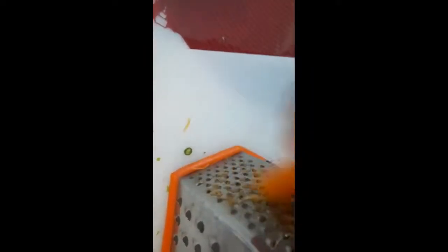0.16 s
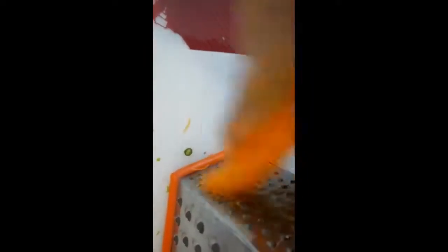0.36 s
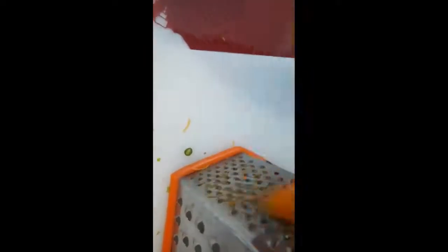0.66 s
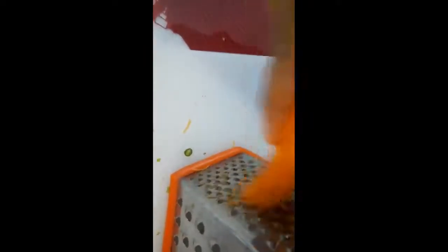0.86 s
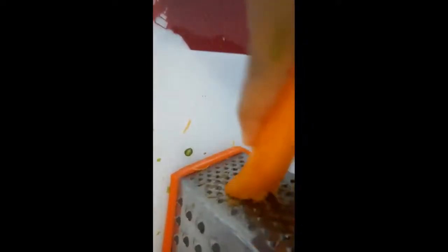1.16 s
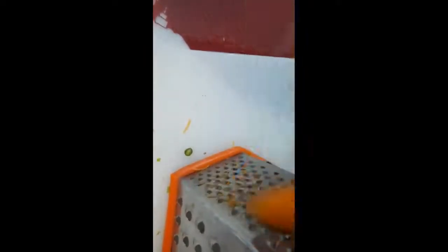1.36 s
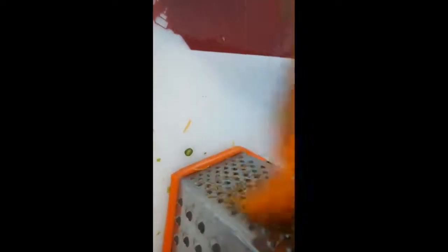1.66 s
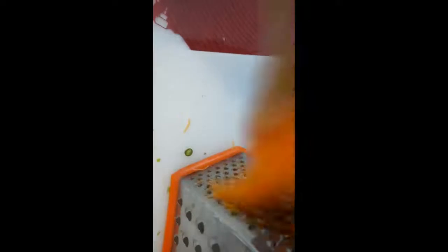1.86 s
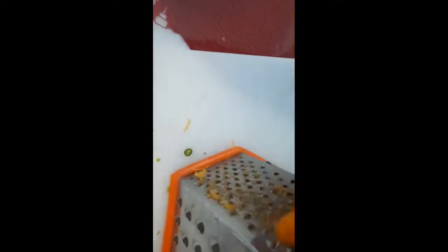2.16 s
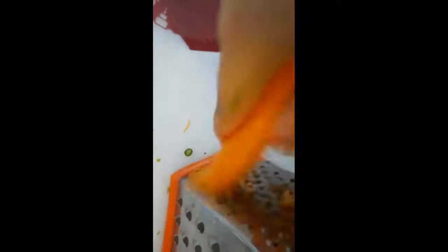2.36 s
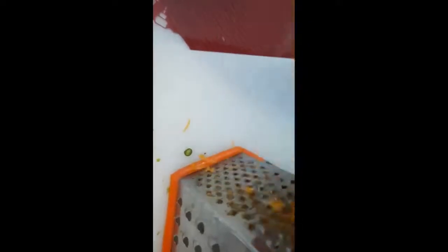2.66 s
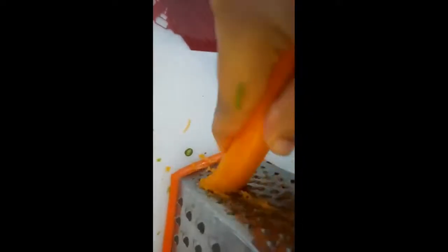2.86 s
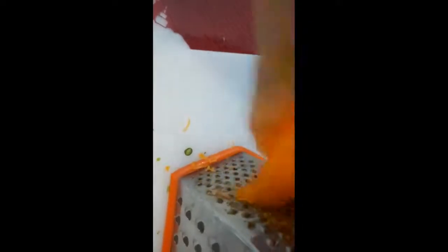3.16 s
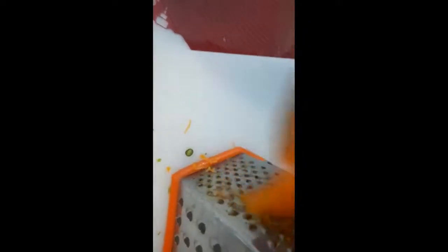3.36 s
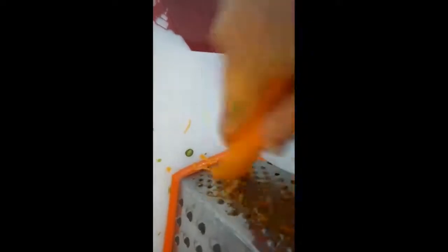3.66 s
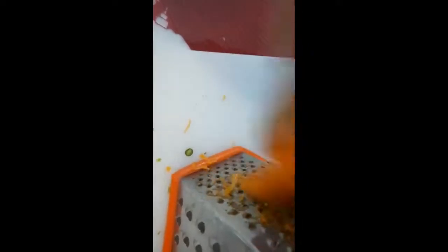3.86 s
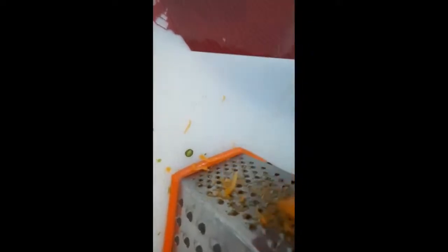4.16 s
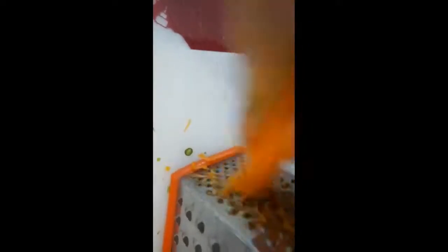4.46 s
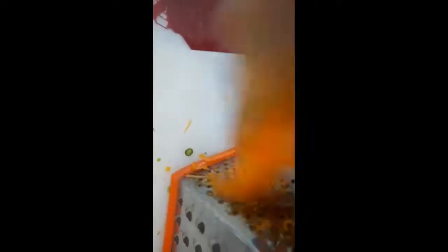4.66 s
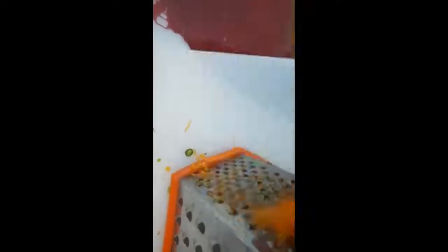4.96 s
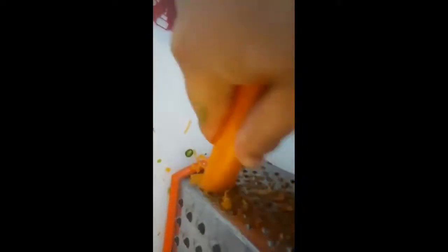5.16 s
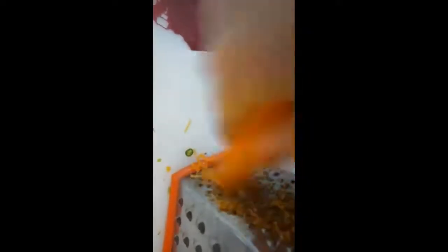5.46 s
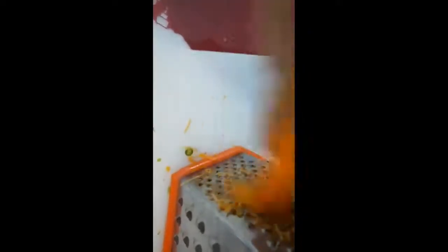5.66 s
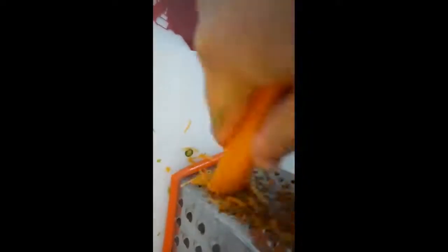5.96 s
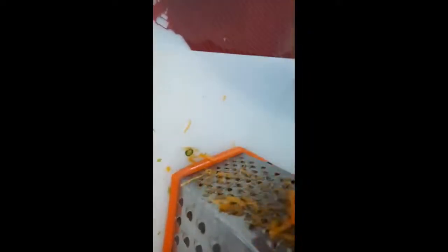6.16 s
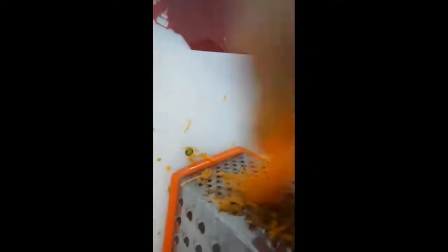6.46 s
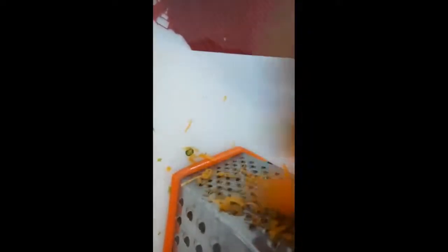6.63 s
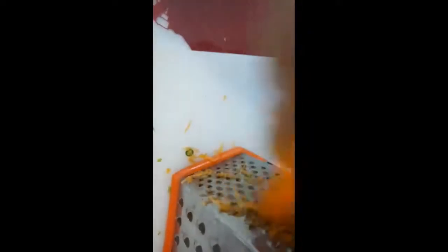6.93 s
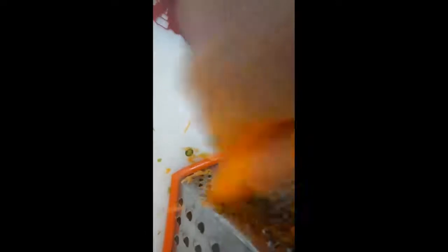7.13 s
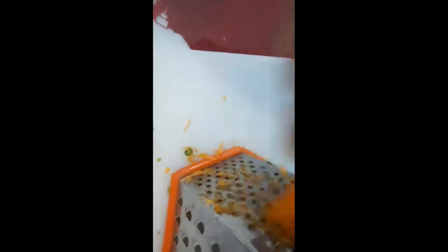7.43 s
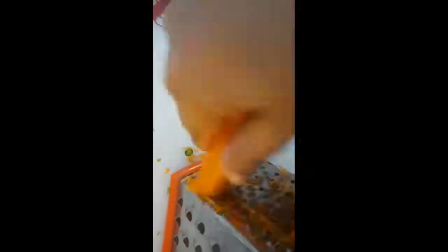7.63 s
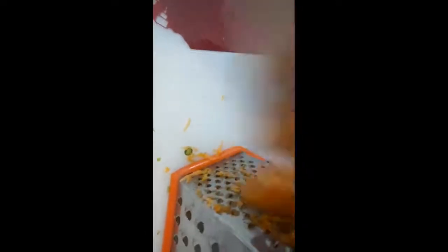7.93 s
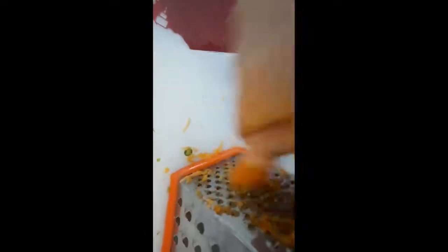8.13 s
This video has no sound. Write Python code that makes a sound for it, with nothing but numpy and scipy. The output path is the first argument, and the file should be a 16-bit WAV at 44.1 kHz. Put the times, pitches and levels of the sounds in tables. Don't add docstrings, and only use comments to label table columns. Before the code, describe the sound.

A carrot is rasped down and up a thin steel box grater in quick even strokes, with wet fizz, metallic ringing and soft board thumps.

```python
import sys
import numpy as np
from scipy import signal
from scipy.fft import rfft, irfft
from scipy.io import wavfile
from scipy.ndimage import uniform_filter1d

SR = 44100
rng = np.random.default_rng(int(sys.argv[2]) if len(sys.argv) > 2 else 0)


def dump(signal):
    limited = np.clip(np.atleast_2d(signal).T, -1, 1)
    pcm = np.round(limited * 32767).astype(np.int16)
    wavfile.write(sys.argv[1], SR, pcm)


def nominal_scale(level):
    x = np.asarray(level, float) / 20
    return 10 ** x


N = 365588

# [f/Hz, level/dB per Hz]
AIR = [(40, -2.5), (400, 2), (1500, -7), (3500, -38), (5000, -27), (7800, -16.5), (8300, -18), (11300, -20),
       (11900, -20.5)]
AIR_DB = -75
ECHO_DB, ECHO_T60_S = -18, 0.31
# [f/Hz, width/Hz, depth 0-1]
NOTCHES = [(1120, 43, 0.33), (2310, 73, 0.74)]

# [f/Hz, width/Hz, level/dB]
BOARD = [(57.1, 42, 3), (72.6, 37, 2.5), (112.8, 43, -1.5), (150.6, 16, -12)]
# [start t/s, build-up/s, hold/s, shake level/dB]
BUMPS = [
    (2.36, .015, .03, -61),
    (5.93, .015, .03, -61),
    (6.81, 0.016, 0.027, -58.5),
    (7.8, 0.014, 0.022, -64),
]
REBOUND_DB, REBOUND_HZ, REBOUND_T60_S = 2, 59.6, 0.1
SHOVE_LAG_S, UP_SHOVE_DB, REST_SHAKE_DB = 0.007, -20.5, -87.5

# [t/s, peak level/dB]
PINGS = [
    (1.063, -54),
    (2.376, -50),
    (3.104, -45),
    (6.846, -37.5),
]
# [f/Hz, level/dB, time to fall 60 dB/s]
PING_TONES = [(1340, -10.5, 0.056), (1970, -5.5, 0.036), (3250, -6, 0.031), (3450, 1, 0.035),
              (5400, -17, 0.037)]

# [f/Hz, width/Hz, level/dB]
WALLS = [(272.2, 42.6, -4.5), (340, 51, -2), (393.6, 35, -4), (579.7, 94, -4.5), (645.5, 112, -4.5),
         (742, 159, 0), (852, 110, -6.5), (943, 38, -3.5), (1210, 19, -8), (1325, 27, 0), (1427, 117, -4),
         (1524, 167, -3), (1774, 163, -5.5), (1933, 218, -3), (2172, 76, -7.5)]
# [f/Hz, width/Hz, level/dB]
FACE = [(2747, 150, -3.5), (2942, 240, -5), (3123, 290, -2), (3246, 73, -9), (3462, 82, 0.5),
        (3518, 84, -1.5), (3724, 91, -10.5), (4110, 190, -17.5)]
# [f/Hz, level/dB per Hz]
FIZZ = [(3000, -7), (4200, 0), (4900, -6), (5450, -2.5), (6000, -4.5), (7500, -10), (8100, -9.5),
        (8500, -5.5), (9900, -4.5), (11300, -3.5), (11800, -17.5), (12600, -37)]
# [f/Hz, level/dB per Hz]
RUB = [(3000, -11.5), (4300, -2), (4900, -8), (5350, -3.5), (6200, -10), (6800, -10.5), (7300, -19.5),
       (8000, -9.5), (8550, -7), (11200, -7.5), (11800, -17), (12600, -36)]
# [f/Hz, level/dB per Hz]
SPRAY = [(10800, -17), (11800, -8), (12400, -3), (15600, 0), (15900, -34)]

# [t/s, tick level/dB, face ring relative to tick/dB]
CATCHES = [(0.099, -42, -8), (0.624, -56, -20), (0.862, -50, 6), (0.907, -41, -14), (1.064, -46, -3),
           (1.284, -44, 3), (1.538, -41, -8), (2.169, -32, -17), (2.375, -44, -8), (2.602, -41, -18),
           (3.003, -46, -12), (3.104, -38, -12), (3.232, -47, -14), (3.263, -39, -33), (3.37, -44, -15),
           (3.404, -34, -9), (3.746, -49, -19), (4.289, -49, -18), (4.392, -54, -19), (4.521, -43, -25),
           (5.334, -41, -2), (5.448, -23, -19), (5.844, -38, -19), (5.952, -43, -7), (6.846, -40, -10),
           (6.969, -43, -26), (7.35, -46.5, -14), (7.794, -33.5, -33), (7.843, -35, -28), (8.189, -45, -4)]
# [t/s, snap level/dB]
SNAPS = [(0.49, -27), (0.52, -37), (0.54, -46), (0.86, -45), (1.062, -30), (2.375, -32), (2.84, -41),
         (3.104, -29), (3.233, -32), (5.449, -28), (5.952, -37), (6.345, -38), (6.437, -39), (6.846, -38)]

# [touch t/s, build-up/s, hold/s, bite level/dB, shove on board relative to bite/dB]
DOWN = [(0.183, 0.091, 0.075, -51.5, -6.0), (0.588, 0.064, 0.0068, -47, -7),
        (0.928, 0.054, 0.012, -42.5, -4), (1.281, 0.096, 0.031, -40.5, -6.5),
        (1.708, 0.1, 0.046, -42.5, -4.5), (2.15, 0.049, 0.047, -43.0, -5), (2.623, 0.066, 0.074, -46, -4.5),
        (2.997, 0.042, 0.012, -45.5, -6), (3.387, 0.083, 0.034, -39.5, -5.5),
        (3.76, 0.072, 0.051, -42.5, -9), (4.142, 0.07, 0.027, -43.5, -8.5), (4.532, 0.08, 0.045, -40.5, -6),
        (4.912, 0.078, 0.098, -43.5, -7.5), (5.321, 0.082, 0.038, -40.5, -6.5),
        (5.716, 0.067, 0.028, -42, -5), (6.121, 0.058, 0.092, -43.5, -4), (6.517, 0.077, 0.057, -44, -1.5),
        (6.968, 0.06, 0.063, -43.5, -4.5), (7.368, 0.055, 0.099, -43, -4.0),
        (7.846, 0.032, 0.064, -42, -8.5), (8.177, 0.052, 0.27, -48, -9)]
PUSHED_ON = [
    (2.253, 0.04, 0.033, -42, -2.5),
    (3.103, 0.046, 0.0025, -39.5, -2.5),
    (4.275, 0.025, 0.026, -47, 0),
    (5.835, 0.029, 0.017, -43, -2),
    (6.654, 0.02, 0.022, -44.5, -7),
]
# [touch t/s, build-up/s, hold/s, bite level/dB, fizz relative to bite/dB]
UP = [(-0.002, 0.16, 0.017, -61, -13), (0.419, 0.007, 0.103, -54.0, -12.5),
      (0.806, 0.034, 0.027, -62.5, -9), (1.06, 0.018, 0.003, -65.5, -4), (1.164, 0.074, 0.0032, -62.0, -15),
      (1.533, 0.021, 0.063, -54, -11.5), (1.975, 0.04, 0.064, -56, -10.5), (2.372, 0.003, 0.15, -54, -14),
      (2.856, 0.011, 0.077, -61.0, -11.5), (3.267, 0.0032, 0.044, -56, -12),
      (3.621, 0.024, 0.044, -53, -16.5), (3.981, 0.024, 0.063, -52.5, -11.5),
      (4.379, 0.025, 0.066, -55.0, -13), (4.761, 0.048, 0.055, -56.5, -11.5),
      (5.169, 0.042, 0.038, -52.5, -14), (5.557, 0.031, 0.06, -51.5, -12), (5.956, 0.05, 0.05, -52, -11),
      (6.366, 0.075, 0.014, -56, -16), (6.776, 0.09, 0.024, -55, -17), (7.212, 0.011, 0.061, -56.5, -12.5),
      (7.595, 0.012, 0.117, -57.5, -17.5), (7.795, 0.003, 0.0074, -62.5, -21),
      (8.043, 0.057, 0.029, -50.5, -20.0)]
# [t/s, bite level/dB]
WOBBLES = [(0.101, -56), (0.488, -62), (1.645, -60), (2.112, -59.5), (2.745, -47.5), (4.47, -71),
           (5.44, -58), (6.052, -54), (6.43, -52), (7.079, -45), (7.515, -51)]
WOBBLE_BUILD_S, WOBBLE_HOLD_S = 0.0062, 0.0052
# [t/s, juice level/dB, free ring of the face/dB]
WEAR = [(0, 1.5, -2.5), (1, -3.5, -2), (2, 0, -1.5), (2.8, 3, -1), (3.6, -2.5, -2), (4.4, -1, 0),
        (5.3, -5.5, -3), (6, -2, -0.5), (6.6, -6.5, -3), (7.1, -4, -1.5), (7.7, -5.5, -4.5),
        (8.3, -9.5, -3.5)]

# (landing dB/s, build-up dB, sag while held dB, lift dB/s, break-off dB)
DOWN_SHAPE = (1140, 17.2, 3.68, 590, 4.6)
UP_SHAPE = (490, 4.9, 4.1, 400, 3)
SHOVE_SHAPE = (770, 16.4, 2.5, 470, 0.51)
WOBBLE_SHAPE = (1500, 9.6, 6.7, 920, 0.6)
BREAK_S = 0.0083

DOWN_FACE_DB, DOWN_FIZZ_DB, DOWN_SPRAY_DB = -4.5, -10.5, -16
UP_FACE_DB, UP_SPRAY_DB = -2, -13
DOWN_UPPER_DB, UP_UPPER_DB = -1.5, 0.27
FACE_PER_BITE = -0.17


def evened(x, size=N):
    power = uniform_filter1d(uniform_filter1d(x ** 2, size), size)
    return x / np.sqrt(abs(power) + 1e-20)


def coloured(x, points):
    f, db = np.transpose(points)
    hz = np.fft.rfftfreq(2 ** 19, 1 / SR)
    gain = nominal_scale(np.interp(np.log(hz + 1), np.log(f + 1), db))
    return irfft(rfft(x, 2 ** 19) * gain)[:N]


def curves(rows):
    s, *columns = np.transpose(rows)
    return [np.interp(np.arange(N) / SR, s, c) for c in columns]


def wander(db, hz):
    knots = nominal_scale(db * rng.standard_normal(4000))
    return np.interp(np.arange(N) * min(hz, 450) / SR, np.arange(len(knots)), knots)


def rising_slope(level_db):
    slope = uniform_filter1d(np.gradient(level_db), size=1500) * SR
    return np.clip(slope / 400, -1, 1)


def bites(per_s, spread_db):
    size = nominal_scale(spread_db * np.minimum(rng.exponential(1, N), 4))
    sign = rng.choice([-1., 1.], N)
    return size * sign * (rng.random(N) < per_s / SR)


def ring(x, modes, drift_db, drift_hz):
    out = np.zeros(N)
    for hz, width, db in modes:
        b, a = signal.iirpeak(hz, hz / (1.307 * width), SR)
        once = signal.lfilter(b, a, x * wander(drift_db, drift_hz))
        out += nominal_scale(db) * signal.lfilter(b, a, once)
    return out


def patchy(x, db):
    _, _, z = signal.stft(x, SR, nperseg=512)
    patches = rng.standard_normal(z.shape)
    for axis in (0, 1):
        patches = uniform_filter1d(patches, size=9, axis=axis)
    return signal.istft(z * nominal_scale(db * patches / patches.std()), SR, nperseg=512)[1][:N]


def pressed(rows, shape):
    land, build_db, sag_db, lift, break_db = shape
    t, gone_db = np.arange(0, N + 32, 32) / SR, 60
    levels_db = np.cumsum([-gone_db - build_db, gone_db, build_db, -sag_db, -break_db, -gone_db])
    power = np.zeros(len(t))
    for s, build, hold, db, *_ in rows:
        times = np.cumsum([-gone_db / land, gone_db / land, build, hold, BREAK_S, gone_db / lift])
        power += nominal_scale(2 * (db + np.interp(t - s, times, levels_db)))
    return np.interp(np.arange(N) / SR, t, power)


def still_air():
    return nominal_scale(AIR_DB) * evened(coloured(rng.standard_normal(N), AIR))


def kitchen(x):
    t, out = np.arange(SR // 3) / SR, np.zeros(N)
    turn = np.arange(N) / SR * 2.7
    for k in range(3):
        tail = rng.standard_normal(len(t)) * nominal_scale(-60 * t / ECHO_T60_S) * (t > 0.004)
        tail = signal.lfilter(*signal.butter(1, 4000., fs=SR), tail)
        share = np.sqrt(2 / 3) * np.cos(np.pi * (turn + k / 3))
        out += signal.oaconvolve(x * share, tail / np.linalg.norm(tail))[:N]
    return out


def shake():
    shoves = [(s + SHOVE_LAG_S, build, hold, db + shove_db)
              for s, build, hold, db, shove_db in DOWN + PUSHED_ON]
    power = pressed(shoves + BUMPS, SHOVE_SHAPE)
    power = power + nominal_scale(2 * UP_SHOVE_DB) * pressed(UP, UP_SHAPE)
    return 10 * np.log10(power + nominal_scale(2 * REST_SHAKE_DB))


def rebound():
    t, lifts = np.arange(SR // 5) / SR, np.zeros(N + SR)
    for s, build, hold, db, shove_db in DOWN + PUSHED_ON:
        lifts[round((s + build + hold + 0.006) * SR)] = nominal_scale(db + shove_db + REBOUND_DB)
    swing = np.sin(2 * np.pi * REBOUND_HZ * t) * nominal_scale(-60 * t / REBOUND_T60_S)
    return signal.oaconvolve(lifts, swing)[:N]


def board():
    shake_db = uniform_filter1d(shake(), size=300)
    pushes = bites(600., 3.3)
    low = ring(pushes, BOARD[:2], drift_db=2.0, drift_hz=9.3)
    high = ring(pushes, BOARD[2:], drift_db=2.0, drift_hz=9.3)
    hum = evened(low + high * nominal_scale(2.1 * rising_slope(shake_db)), size=1200) * nominal_scale(shake_db)
    return signal.sosfilt(signal.butter(3, 38., "high", fs=SR, output="sos"), hum + rebound())


def pings():
    t, flicks = np.arange(3000) / SR, np.zeros(N)
    for s, db in PINGS:
        flicks[round(s * SR)] = nominal_scale(db)
    tone = sum(nominal_scale(db - 60 * t / t60) * np.sin(2 * np.pi * hz * t) for hz, db, t60 in PING_TONES)
    return signal.oaconvolve(flicks, tone * np.minimum(t / 0.0044, 1))[:N]


def catches():
    t = np.arange(3000) / SR
    tick, clink, snap = np.zeros((3, N + 3000))
    for s, tick_db, face_db in CATCHES:
        span = slice(round(s * SR), round(s * SR) + len(t))
        tick[span] += nominal_scale(tick_db - 60 * t / 0.08)
        clink[span] += nominal_scale(tick_db + face_db - 60 * t / 0.06)
    for s, snap_db in SNAPS:
        snap[round(s * SR):][:len(t)] += nominal_scale(snap_db - 60 * t / 0.033)
    return tick[:N], clink[:N], snap[:N]


def bite():
    extra = [(s, WOBBLE_BUILD_S, WOBBLE_HOLD_S, db) for s, db in WOBBLES]
    power = pressed(DOWN + PUSHED_ON, DOWN_SHAPE) + pressed(UP, UP_SHAPE)
    return 10 * np.log10(power + pressed(extra, WOBBLE_SHAPE))


def touch():
    juice_db, free_db = curves(WEAR)
    rows = []
    for s, build, hold, db, _ in DOWN + PUSHED_ON:
        face_db = DOWN_FACE_DB + FACE_PER_BITE * (db + 42.5)
        rows.append((s + build, face_db, DOWN_FIZZ_DB, DOWN_SPRAY_DB, DOWN_UPPER_DB, 1))
    for s, build, hold, db, fizz_db in UP:
        face_db = UP_FACE_DB + FACE_PER_BITE * (db + 54.5)
        rows.append((s + build + hold / 2, face_db, fizz_db, fizz_db + UP_SPRAY_DB, UP_UPPER_DB, 0))
    face_db, fizz_db, spray_db, upper_db, down = curves(sorted(rows))
    wet_db = down * juice_db
    return face_db + free_db, fizz_db + 0.21 * wet_db, spray_db + wet_db, upper_db


def walls(teeth, force, tick, upper_db):
    lower = evened(ring(teeth, WALLS[:8], drift_db=3.0, drift_hz=20.), size=1500)
    upper = evened(ring(teeth, WALLS[8:], drift_db=3.0, drift_hz=20.), size=1500)
    both = (lower + nominal_scale(upper_db) * upper) / np.sqrt(1 + nominal_scale(2 * upper_db))
    return both * (force + nominal_scale(-20.0) * tick)


def punched_face(teeth, force, clink, face_db, cutting, rising):
    flex = ring(teeth, FACE[:2], drift_db=4.5, drift_hz=16.)
    chime = ring(teeth, FACE[2:], drift_db=4.5, drift_hz=16.)
    face = evened(chime + flex * nominal_scale(4.6 * (cutting - 2)), size=1200)
    drive = force * nominal_scale(face_db + 0.37 * rising) * wander(1.85, 40.)
    return face * (drive + nominal_scale(-12) * clink)


def fibres_and_spray(tearing, snap, fizz_db, spray_db, cutting):
    shreds = bites(10000., 1.8)
    wet = np.sqrt(cutting) * evened(coloured(shreds, FIZZ))
    dry_rub = np.sqrt(1 - cutting) * evened(coloured(shreds[::-1], RUB))
    fibres = evened(patchy(wet + dry_rub, db=2.0), size=2000)
    fibres *= tearing * nominal_scale(fizz_db) * wander(1.37, 30.) + nominal_scale(-27.5) * snap
    spray = evened(coloured(shreds, SPRAY))
    spray *= tearing * nominal_scale(spray_db) * wander(2.6, 30.) + nominal_scale(-41) * snap
    return fibres + spray


def grater():
    bite_db = uniform_filter1d(bite(), size=200)
    face_db, fizz_db, spray_db, upper_db = touch()
    force = evened(wander(1.44, 190.) * wander(0.67, 50.), size=1500) * nominal_scale(bite_db)
    rising = rising_slope(bite_db)
    pressure_db = uniform_filter1d(bite_db, size=1500)
    tear_db = 0.21 * (pressure_db + 61.5) + 0.5 * (pressure_db - bite_db) - 3.0 * rising
    tick, clink, snap = catches()
    teeth = bites(1800., 2.45)
    cutting = np.clip((spray_db - fizz_db + 13.5) / 7, 0, 1)
    steel = walls(teeth, force, tick, upper_db)
    steel = steel + punched_face(teeth, force, clink, face_db, cutting, rising)
    return patchy(steel, db=2.0) + fibres_and_spray(force * nominal_scale(tear_db), snap, fizz_db, spray_db, cutting)


def scene():
    rasp = grater() + pings()
    mono = still_air() + nominal_scale(ECHO_DB) * kitchen(rasp) + board() + rasp
    return np.array([mono, mono])


def top_cut(x):
    return signal.sosfilt(signal.butter(12, 16430, fs=SR, output="sos"), x)


def record(dry):
    mono = dry[0]
    for hz, width, depth in NOTCHES:
        mono = mono - depth * signal.lfilter(*signal.iirpeak(hz, hz / width, SR), mono)
    hz, _, z = signal.stft(mono, SR, nperseg=2048)
    z = z * (hz[:, None] < 15830)
    specks = (rng.random(z.shape) < 0.012) * (hz[:, None] > 4600.)
    mono, side = signal.istft(np.array([z, z * specks]), SR, nperseg=2048)[1][:, :N]
    side = side * nominal_scale(-3)
    return top_cut(mono + np.array([side, -side]))


dry = scene()
out = record(dry)
dump(out)
```